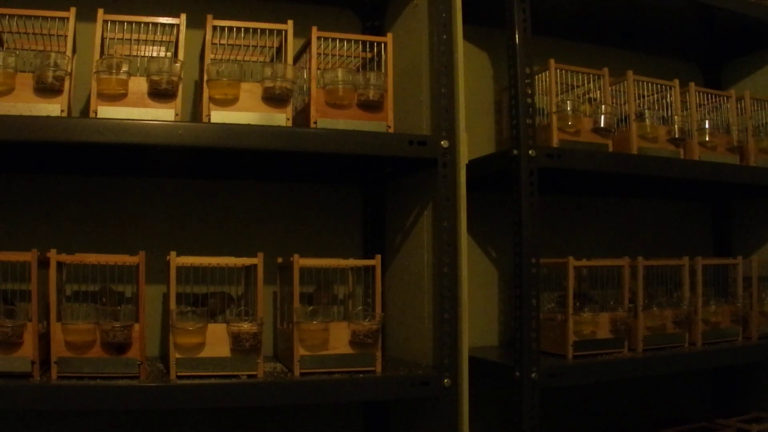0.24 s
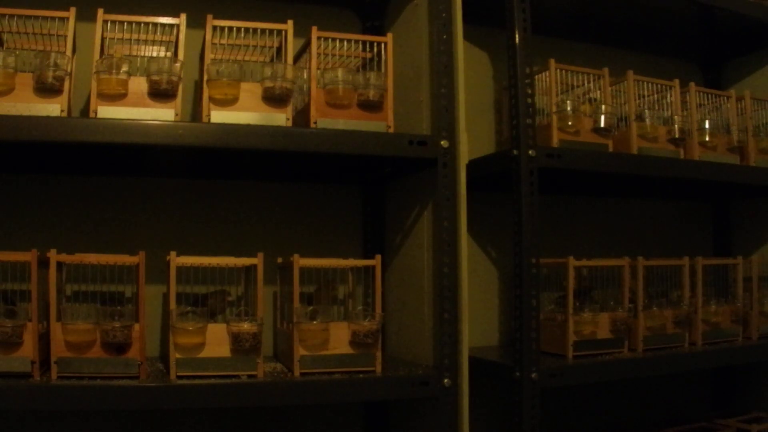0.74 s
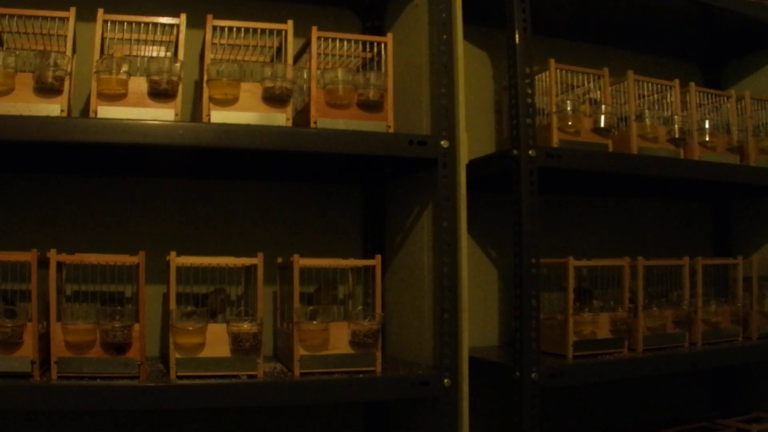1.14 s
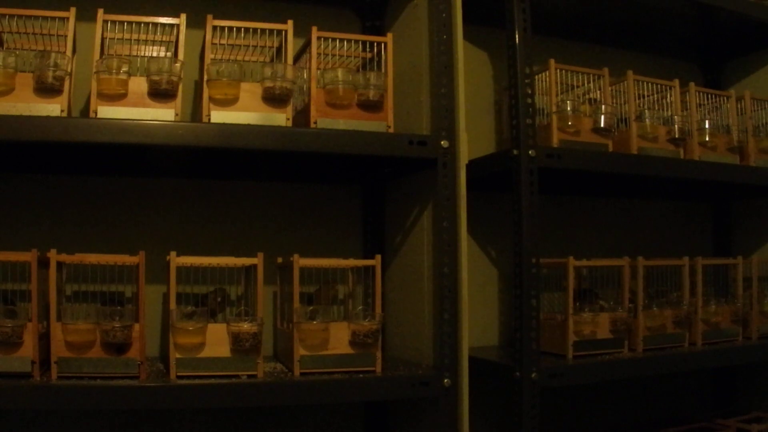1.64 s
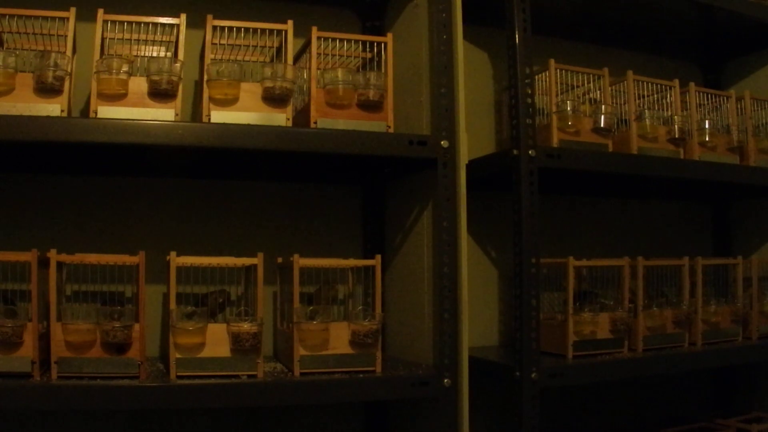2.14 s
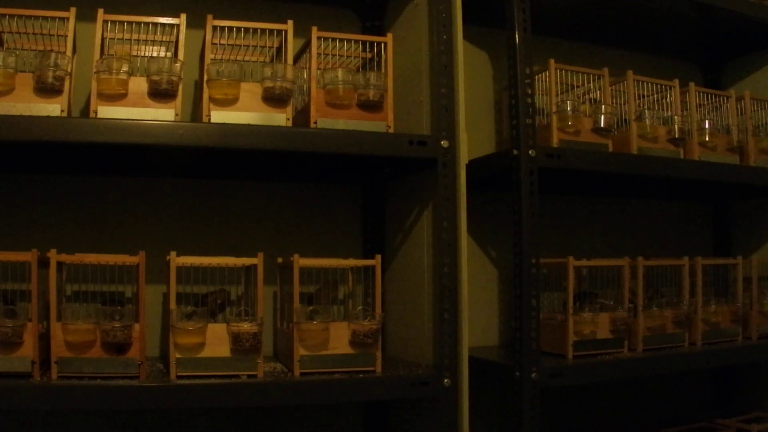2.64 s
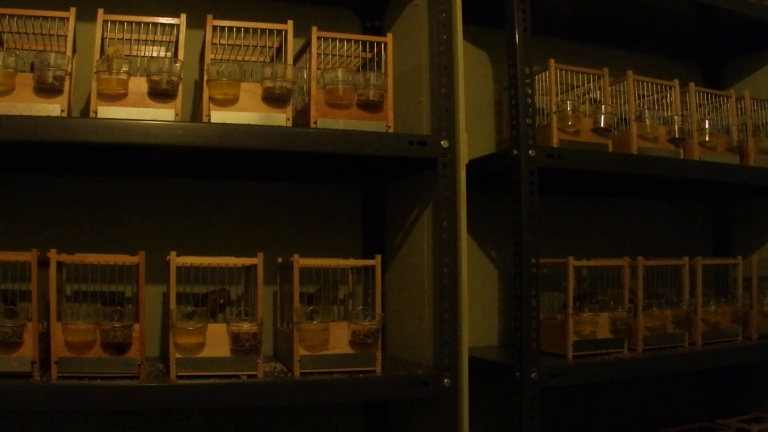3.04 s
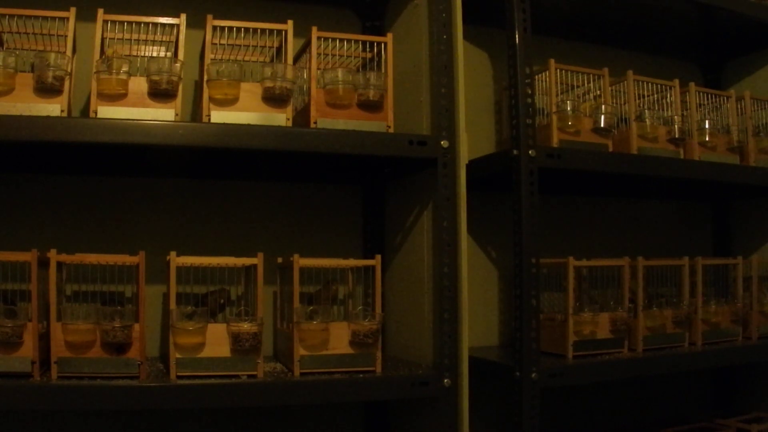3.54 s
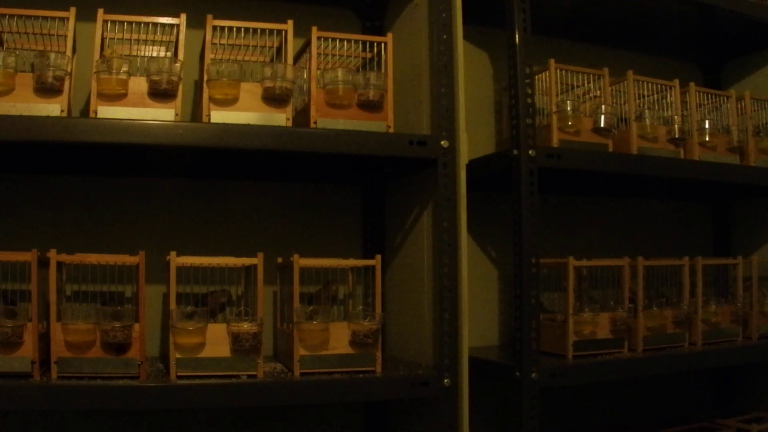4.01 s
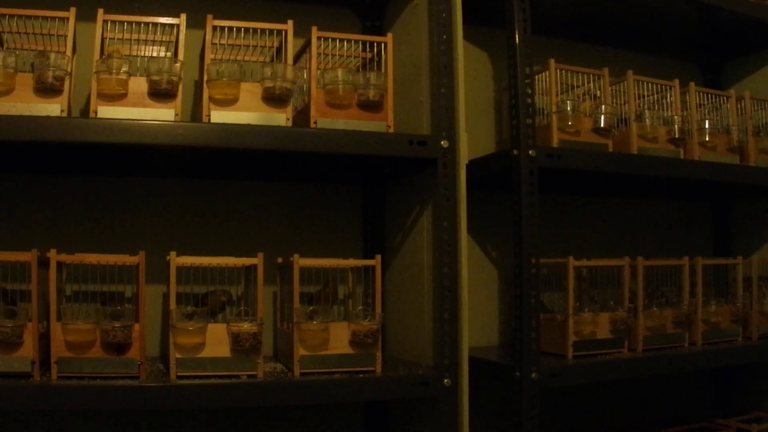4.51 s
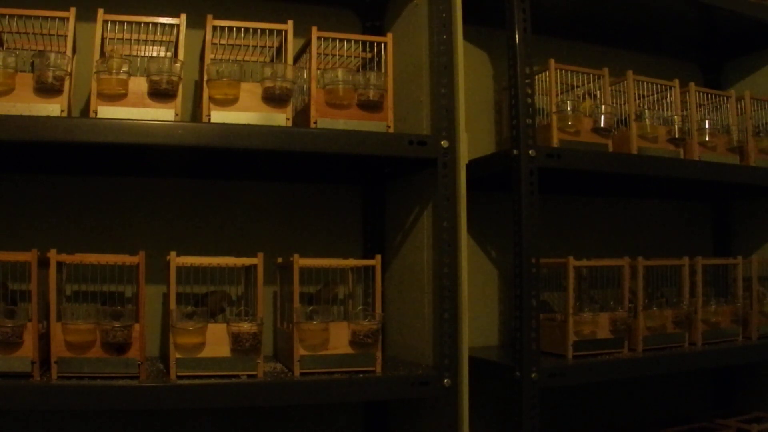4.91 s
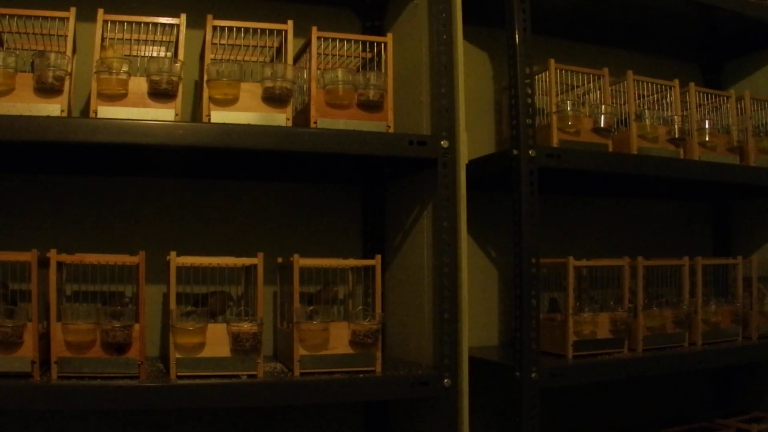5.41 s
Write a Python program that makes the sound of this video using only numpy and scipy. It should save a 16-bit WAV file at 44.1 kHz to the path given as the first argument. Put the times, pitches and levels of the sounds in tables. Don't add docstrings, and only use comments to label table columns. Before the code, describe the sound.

Many canaries sing at once in a bare room of shelved cages, the nearest close to a small, bright microphone. From 0 to 0.5 s scattered chips and short whistles overlap. Around 0.5-1.2 s a near bird repeats an even, upward-hooked syllable about seventeen times a second, while smooth falling whistles slide above it. From 1.3 to 2.3 s clear held notes step between two pitches, one whistle lasting about a quarter second. From 2.3 to 3.6 s higher whistles mix with rapid chips and steep falls. Low, level peeps run from 3.7 to 4.4 s with sharp snaps. From 4.4 s to the end, a bright piped roll repeats nearly ten times a second, each note answered lower, over a falling trill. Hard walls ring for about half a second; distant birds blur into haze above faint rumbling hum. Tiny ticks and slight level dips mark overloads.

```python
import sys
import numpy as np
from scipy import signal
from scipy.fft import rfft, irfft, next_fast_len
from scipy.io import wavfile
from scipy.ndimage import uniform_filter1d

SR = 44100
rng = np.random.default_rng(int(sys.argv[2]) if len(sys.argv) > 2 else 0)


def rack_gain(trim_db):
    fader = np.asarray(trim_db, float)
    return 10 ** (fader / 20)


def digitize_waveform(pressure):
    field = np.atleast_2d(pressure).T
    bounded = np.clip(field, -1, 1)
    quanta = np.round(bounded * 32767).astype(np.int16)
    wavfile.write(sys.argv[1], SR, quanta)


N = 249606

# multiple, under_whistle_db
OVERTONES = [(2, -28), (3, -27), (4, -27), (5, -57)]
SHIMMER = .32

# pitch_hz, t60_s
WALL_RING = [(1000, 0.6), (3000, 0.52), (6000, 0.29), (12000, 0.29)]
# pitch_hz, level_db
HUM_TONE = [(25, -8), (60, -9), (180, -4.5), (600, -10), (1100, -9.5), (2500, -14), (7000, -23),
            (15500, -30)]
# time_s, level_db
HUM_SWELL = [(0.0, -64.5), (0.2, -58.5), (2.88, -61), (3.31, -57), (3.39, -64.5), (3.56, -63), (5.66, -66)]

# pitch_hz, level_db
FAR_TONE = [(410, -59), (700, -29), (1820, -16.5), (2110, -13.5), (2700, -6), (3620, 1), (4510, -13),
            (5600, -10.5), (7280, -42), (12300, -120)]
# time_s, level_db
FAR_SWELL = [(0.0, -44.5), (1.5, -50.5), (5.66, -49)]

# start_s, length_ms, first_hz, level_db
BACK_FALLS = [(0, 5.7, 4250, -40.5), (.01, 31, 2730, -52.5), (.065, 21, 5330, -55),
              (.32, 28.6, 1833, -43.5), (.385, 26, 5380, -42), (.42, 49, 3165, -44), (.665, 38, 4700, -38),
              (.867, 12, 5270, -44), (1.28, 11.3, 5480, -41), (1.528, 15, 1950, -47),
              (1.94, 13, 1850, -53.5), (2.29, 29, 6820, -40), (2.298, 25, 4690, -31),
              (2.352, 37, 3260, -52), (2.603, 8.1, 6860, -43.5), (2.628, 17, 6030, -34),
              (2.64, 26.5, 3520, -37.5), (2.73, 21, 2750, -45), (3.075, 33, 3990, -38.5),
              (3.135, 14, 5500, -36), (3.63, 22, 1975, -49), (3.68, 11, 2430, -47), (3.862, 13, 4700, -33),
              (3.89, 36, 3630, -44.5), (4.19, 20, 3490, -41.5), (4.475, 22, 3830, -38),
              (4.815, 18, 4200, -33.5), (5.045, 13.5, 3730, -30.5), (5.122, 37, 2896, -46),
              (5.47, 16, 3655, -35.5)]
# start_s, length_ms, level_db
FLUTE_NOTES = [
    (2.12, 48, -51),
    (2.78, 80, -53.5),
    (3.32, 154, -54),
    (3.75, 18, -43.5),
    (4.12, 71, -52.5),
]
FLUTE_HZ = 1960

LIFT, SWOOP, DIP, DROP, BACK_DROP, SNAP_DROP, PIPE_LIFT = .0016, .004, -.0022, -.0085, -.01, -.034, .0013
# start_s, length_ms, pitch_hz, level_db
LEVEL_WHISTLES = [(1.417, 15, 2797, -26.5), (1.589, 53, 2832, -35), (1.7, 50, 2780, -29),
                  (1.655, 45, 2735, -27), (1.86, 42, 2842, -44), (1.981, 67.5, 2773, -27),
                  (2.09, 24, 2828, -23.5), (2.125, 40.5, 2855, -44.5), (2.328, 50, 4792, -25),
                  (2.383, 15, 4774, -20.5), (2.41, 15, 4670, -26.5), (2.415, 34, 3768, -30),
                  (2.647, 72.4, 4804, -21.5), (2.946, 77.4, 3904, -24.5), (3.005, 62, 3947, -28),
                  (.028, 19, 3444, -40.5), (.1, 32, 4900, -48), (0.688, 47, 3930, -42.5),
                 (.247, 27, 3526, -33.5), (1.068, 43, 3721, -31), (.357, 25, 3473, -34),
                 (.462, 22, 3510, -34), (1.93, 40, 3706, -32), (2.136, 12, 2837, -30),
                 (2.248, 70, 6800, -47.5), (2.265, 59, 3755, -26.5), (2.377, 15, 1798, -45.5),
                 (2.805, 77, 6780, -48), (3.045, 57, 4014, -31), (3.203, 16, 3030, -34.5),
                 (3.237, 7, 3955, -28.5), (3.263, 24, 6048, -28.5), (3.421, 27.4, 2750, -34),
                 (3.6, 16.4, 3220, -31), (3.501, 18.5, 2657, -37.5), (3.599, 7, 3714, -28),
                 (3.709, 27, 3875, -30), (3.964, 16, 6787, -46), (4.508, 69, 3340, -40.5),
                 (4.959, 19, 1860, -42), (5.21, 17, 1930, -44), (5.275, 40, 1897, -40),
                 (5.49, 30, 4400, -44), (5.56, 64, 1902, -43), (5.635, 11.6, 1923, -36.5)]
# start_s, length_ms, first_hz, level_db
DIPS = [(.07, 23, 1833, -45.5), (.489, 15.7, 5250, -40), (4.775, 25, 3620, -34), (0.56, 55, 3147, -36),
        (.756, 14, 2900, -39), (4.86, 14, 3900, -33.5), (1.168, 7.8, 2860, -30.5), (5.045, 25, 3560, -35),
        (5.195, 25, 3560, -36), (1.612, 14, 1000, -54), (5.465, 25, 3420, -36), (1.47, 26, 3400, -36),
        (1.497, 14, 4700, -39), (5.315, 25, 4350, -46), (2.47, 21, 6050, -30.5), (2.52, 26, 4060, -28),
        (2.538, 30, 6900, -46), (3.076, 29, 3870, -40), (3.085, 12, 4300, -33), (3.54, 30, 6250, -33),
        (3.315, 9.5, 6550, -53), (3.323, 29, 4120, -30.5), (4.647, 30.4, 3520, -34), (4.415, 8, 4700, -33),
        (5.328, 38, 3540, -38)]
# start_s, length_ms, first_hz, level_db
LIFTS = [(.17, 13, 3430, -56), (.515, 35, 2814, -35.5), (.96, 20, 2853, -34.5), (.494, 8.7, 2564, -39),
         (1.822, 15, 3633, -32), (2.866, 10.5, 1680, -40.5), (2.919, 17, 2546, -31.5),
         (3.036, 25, 2097, -41), (2.64, 22, 4580, -31), (3.203, 12.5, 2214, -39.5),
         (4.221, 31, 4400, -38.5), (4.678, 14, 6600, -57), (4.817, 16, 6750, -54), (4.919, 26, 3400, -36)]
# start_s, length_ms, first_hz, level_db
SWOOPS = [(.123, 38, 3020, -32.5), (.135, 6.3, 3450, -26), (.168, 14, 4840, -42), (.407, 53, 2080, -43.5),
          (.422, 15, 2930, -34.5), (.52, 12, 3520, -36), (.49, 28, 2482, -37.5), (.632, 12, 2463, -33.5),
          (1.243, 24, 2970, -27), (2.51, 11, 5000, -30), (3.116, 16, 5610, -35), (3.33, 7.7, 3620, -41.5),
          (3.991, 26, 3020, -32.5)]
# start_s, length_ms, first_hz, level_db
DROPS = [(.26, 8.7, 5220, -44), (.292, 3.7, 5240, -38.5), (.949, 23, 3170, -34), (1.279, 5.6, 2940, -25.5),
         (1.535, 34, 3620, -31.5), (1.547, 6.5, 4530, -38.5), (2.785, 33.6, 3865, -32.5),
         (2.94, 17.3, 3560, -29), (3.156, 22, 1890, -43), (3.253, 13, 4760, -43), (3.303, 20, 5950, -28.5),
         (3.322, 12, 4650, -37), (3.53, 18, 4680, -41), (3.575, 25.5, 6086, -29.5), (3.59, 14, 7270, -42.5),
         (3.652, 14, 4500, -41), (3.752, 4.6, 4270, -30.5), (3.969, 6.9, 5100, -37), (4.176, 15, 5080, -38),
         (5.476, 9.5, 4490, -34)]
# start_s, pitch_hz, level_db
PEEPS = [
    (3.705, 2605, -35),
    (3.824, 2535, -32.5),
    (3.935, 2610, -34),
    (4.037, 2526, -33),
    (4.145, 2517, -34.5),
    (4.197, 2440, -45.5),
    (4.248, 2470, -32.5),
    (4.297, 2566, -37.5),
    (4.362, 2530, -38),
]
PEEP_MS = 14.9
# start_s, length_ms, first_hz, last_hz, level_db
SLIDES = [(.604, 65, 4236, 3930, -33), (.81, 70, 4295, 4030, -33), (1.182, 45, 4315, 3780, -35),
          (1.45, 60, 4370, 3790, -38), (1.672, 76, 3613, 3688, -32), (1.765, 238, 3670, 3705, -33),
          (2.01, 110, 3710, 3592, -31.5), (2.155, 98, 3465, 3537, -30), (1.31, 82, 2963, 2772, -24.5),
          (.263, 7, 4850, 4150, -25), (.134, 16, 3300, 3760, -31), (1.045, 25, 3680, 3700, -40),
          (2.895, 50, 4000, 3900, -39), (3.33, 18, 4150, 3000, -31), (4.238, 25, 4100, 3950, -33),
          (3.61, 20, 3400, 3250, -31), (3.32, 20, 5050, 4950, -33), (3.83, 14, 4600, 4400, -36),
          (1.72, 30, 1020, 980, -59), (1.555, 14, 1800, 1550, -48), (4.535, 20, 6300, 6500, -57)]
SLIDE_WET_DB = -2.5
# start_s, first_hz, level_db
SNAPS = [(.255, 4450, -36), (1.503, 6790, -27.5), (1.852, 6720, -28.5), (1.898, 4930, -33.5),
         (2.525, 4230, -23), (3.832, 6560, -31.5), (4.028, 5025, -29), (4.034, 5680, -21),
         (4.234, 5566, -22.5), (4.427, 5940, -23.5), (4.615, 5780, -20.5), (4.813, 5660, -27.5),
         (5.056, 5700, -28), (5.43, 6300, -35), (4.949, 6950, -36)]
SNAP_MS = 8.17
# start_s, settled_hz, level_db
HOOKS = [(.497, 3260, -34.5), (.552, 3340, -26.5), (.61, 3396, -26), (.664, 3350, -29), (.717, 3327, -28),
         (.776, 3334, -27), (.835, 3300, -27), (.892, 3264, -27), (.95, 3315, -27.5), (1.008, 3255, -25.5),
         (1.068, 3270, -26.5), (1.128, 3265, -26.5), (1.192, 3300, -27.5)]
HOOK_MS, HOOK_FROM, HOOK_BEND = 36, .885, .25
# first_s, last_s, (syllables, length_ms), first_hz, last_hz, level_db
TRILLS = [
    (4.497, 5.638, (12, 16.1), 3155, 2494, -37.5),
    (0.729, 1.34, (4, 30), 1051, 978, -52.5),
    (.897, 1.55, (4, 25), 1950, 1498, -46.5),
    (1.099, 1.749, (4, 30), 2356, 2050, -47),
    (3.91, 4.92, (6, 16.1), 2000, 1207, -48.5),
    (4.593, 5.55, (8, 24), 2080, 2058, -42),
    (4.95, 5.501, (5, 10), 6950, 6010, -43.5),
    (5.159, 5.538, (3, 52), 8020, 6670, -46),
]
# start_s, pitch_hz, level_db, answer_db
ROLL = [(4.443, 4596, -22.5, -34.5), (4.541, 4577, -22, -31.5), (4.647, 4606, -24, -31),
        (4.744, 4542, -24.5, -27.5), (4.85, 4610, -25, -26.5), (4.956, 4620, -22.5, -24.5),
        (5.062, 4650, -23.5, -27), (5.169, 4600, -25, -25.5), (5.276, 4620, -25.5, -24.5),
        (5.381, 4677, -26, -23.5), (5.48, 4770, -31.5, -23.5), (5.579, 4820, -32, -27.5)]
PIPE_MS, ANSWER_MS, ANSWER_LAG_S, ANSWER_RATIO = 21.3, 12, .031, .8

# pitch_hz, level_db
MIC_TONE = [(6700, 5), (7600, -8.5), (9300, -4), (11000, -2.5), (14000, 2.5), (15800, -13), (16000, -52.5)]
# start_s, level_db
TICKS = [(.672, -40), (1.711, -26), (2.031, -26), (2.097, -27), (2.389, -33), (3.332, -33), (3.62, -34),
         (4.43, -32), (4.618, -28), (5.103, -31), (5.418, -32)]
TICK_GRIP_DB = 17.


def read(points, hz):
    f, value = np.transpose(points)
    return np.interp(np.log(hz + 1), np.log(f + 1), value)


def evened(x):
    return x / np.sqrt(np.mean(x ** 2) + 1e-20)


def coloured(x, points):
    gain_db = read(points, np.fft.rfftfreq(len(x), 1 / SR))
    return irfft(rfft(x) * rack_gain(gain_db), len(x))


def along(curve):
    s, db = np.transpose(curve)
    return rack_gain(np.interp(np.arange(N) / SR, s, db))


def add(mix, s, sound):
    part = mix[max(round(s * SR), 0):][:len(sound)]
    part += sound[:len(part)]


def note(ms, first_hz, last_hz, db, luck, bend=0.897, edge=0.79, overtones=OVERTONES):
    u = np.linspace(0, 1, max(round(ms * SR / 1000), 8))
    waver_hz = 22 + 40 * luck[-1]
    waver = np.sin(2 * np.pi * (waver_hz * u * ms / 1000 + luck[0]))
    glide = 1 - (1 - u) ** (1 / bend)
    hz = (first_hz + (last_hz - first_hz) * glide) * (1 + .0035 * waver)
    turn = 2 * np.pi * (np.cumsum(hz) / SR + luck[0])
    breath = signal.windows.tukey(len(u), np.clip(edge, 0, 1)) * rack_gain(1.8 * waver)
    tone = np.sin(turn)
    for (k, under_db), chance in zip(overtones, luck[1:]):
        strength = rack_gain(under_db + 0.97 * (chance - 2.5)) * breath
        tone += strength * np.sin(k * turn) * (k * hz < SR / 2)
    return np.sqrt(2) * rack_gain(db) * breath * tone


def song(rows, edge, bend=1., veil_db=0.):
    out = np.zeros(N)
    overtones = [(k, db + veil_db) for k, db in OVERTONES]
    for (s, *shape), luck in zip(rows, rng.random((len(rows), 5))):
        add(out, s, note(*shape, luck, edge=edge, bend=bend, overtones=overtones))
    return out


def gliding(rows, glide):
    return [(s, ms, hz, hz * np.exp(glide * ms), db) for s, ms, hz, db in rows]


def lasting(rows, ms):
    return [(s, ms, hz, db) for s, hz, db in rows]


def walls(x, count=3):
    out, t = np.zeros(N), np.arange(N) / SR
    for k in range(count):
        taps = np.zeros(SR)
        at = np.arange(120, SR - 20, 20)
        taps[at + rng.integers(0, 20, len(at))] = rng.choice([-1., 1.], len(at))
        taps[(SR * rng.uniform(.004, .03, size=6)).astype(int)] = 2.27
        hz, lag, z = signal.stft(taps, SR, nperseg=128)
        decay = rack_gain(-60 * lag / read(WALL_RING, hz)[:, None])
        tail = signal.istft(z * decay, SR, nperseg=128)[1]
        share = np.sqrt(2 / count) * np.cos(np.pi * (2.3 * t + k / count))
        out += signal.fftconvolve(x * share, tail / np.linalg.norm(tail))[:N]
    return coloured(out, [(6500, 0.93), (11000, -0.61)])


def room_hum():
    return rack_gain(2.0) * along(HUM_SWELL) * evened(coloured(rng.standard_normal(N), HUM_TONE))


def far_cages(count=1500):
    out = np.zeros(N)
    for s, pitch, length, fall, level in rng.random((count, 5)):
        hz = 900 * 8 ** pitch
        last_hz = hz * (.95 - .3 * fall)
        add(out, s * N / SR, note(6 + 14 * length, hz, last_hz, 6.0 * level, [level], overtones=[]))
    return evened(walls(coloured(out, FAR_TONE))) * along(FAR_SWELL) * rack_gain(4.5)


def back_shelves():
    flute = [(s, ms, FLUTE_HZ, FLUTE_HZ, db) for s, ms, db in FLUTE_NOTES]
    return song(gliding(BACK_FALLS, BACK_DROP) + flute, edge=0.16, veil_db=1.)


def whistles():
    level = gliding(LEVEL_WHISTLES, 0)
    return song(level + gliding(LIFTS, LIFT) + gliding(DIPS, DIP), edge=0.28)


def chips():
    peeps = gliding(lasting(PEEPS, PEEP_MS), 0)
    return song(peeps + gliding(SWOOPS, SWOOP) + gliding(DROPS, DROP), edge=0.33, veil_db=-2.)


def smooth_slides():
    return song(SLIDES, edge=0.31, bend=0.599, veil_db=-2.5)


def snaps():
    return song(gliding(lasting(SNAPS, SNAP_MS), SNAP_DROP), edge=0.67, bend=0.5, veil_db=-4.)


def trills():
    out = np.zeros(N)
    for (s, hz, db), luck in zip(HOOKS, rng.random((len(HOOKS), 5))):
        add(out, s, note(HOOK_MS, hz * HOOK_FROM, hz, db, luck, bend=HOOK_BEND, edge=0.39))
    for first, last, (count, ms), first_hz, last_hz, db in TRILLS:
        bend = .21 if last_hz > first_hz else .8
        for s, luck in zip(np.linspace(first, last, round(count)), rng.random((round(count), 5))):
            end_hz = last_hz * (1 + .01 * (luck[4] - .5))
            add(out, s, note(ms, first_hz, end_hz, db, luck, bend=bend, edge=.4))
    return out


def piped_roll():
    pipes = [(s, PIPE_MS, hz, db) for s, hz, db, _ in ROLL]
    answers = [(s + ANSWER_LAG_S, ANSWER_MS, hz * ANSWER_RATIO, db) for s, hz, _, db in ROLL]
    return song(gliding(pipes + answers, PIPE_LIFT), edge=0.47)


def rasp(birds, chatter):
    z = signal.hilbert(birds, next_fast_len(N))[:N]
    beats = coloured(abs(z) ** 2, [(60, -39.5), (300, -7), (900, 3), (2000, -16.5), (5000, -29)])
    loudness = np.sqrt(abs(uniform_filter1d(chatter ** 2, size=500)))
    hiss = evened(coloured(rng.standard_normal(N), [(5000, -42.0), (7000, 3.5), (14000, 0.5)]))
    return rack_gain(-15.5) * beats + rack_gain(-26.5) * loudness * hiss


def shimmered(birds):
    top = coloured(birds, [(7000, -60), (7600, 0)])
    flutter = evened(coloured(rng.standard_normal(N), [(8, -6), (60, 0), (250, -12), (500, -50)]))
    return birds + SHIMMER * flutter * top


def scene():
    back, whistle, chip, slide = back_shelves(), whistles(), chips(), smooth_slides()
    snap, trill, pipe = snaps(), trills(), piped_roll()
    clear = rack_gain(-2.0) * whistle + rack_gain(1.0) * pipe + rack_gain(-3.0) * trill
    clear += walls(rack_gain(2.0) * whistle + rack_gain(-2.5) * pipe + rack_gain(-4.0) * trill)
    chatter = rack_gain(0.4) * chip + rack_gain(0.5) * snap + rack_gain(-4.5) * back
    chatter += walls(rack_gain(-0.6) * chip + rack_gain(0.5) * snap + rack_gain(0.5) * back)
    bed = rasp(clear + chatter, chatter) + far_cages() + room_hum()
    slide_in_room = slide + rack_gain(SLIDE_WET_DB) * walls(slide)
    return (shimmered(clear + chatter + slide_in_room) + bed)[None]


def top_cut(x):
    return signal.sosfilt(signal.butter(12, 15880, fs=SR, output="sos"), x)


def record(dry):
    x = coloured(dry[0], MIC_TONE)
    for s, db in TICKS:
        add(x, s, rack_gain(db) * signal.windows.gaussian(41, 3))
    peak_db = 20 * np.log10(abs(x) + 1e-9)
    for s, db in TICKS:
        peak_db[round(s * SR)] = db + TICK_GRIP_DB
    fall = np.arange(N) * 26.2 / SR
    held_db = np.maximum.accumulate(peak_db + fall) - fall
    over_db = np.maximum(held_db + 17.0, 0)
    grip = np.exp(-1 / (.003 * SR))
    cut_db = 0.65 * signal.lfilter([1 - grip], [1, -grip], over_db)
    return top_cut((x / rack_gain(cut_db))[None])


dry = scene()
out = record(dry)
digitize_waveform(out)
```